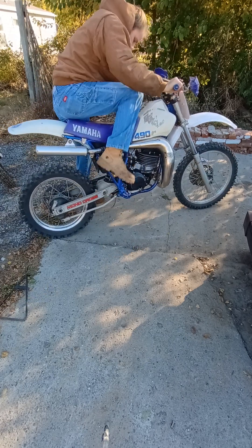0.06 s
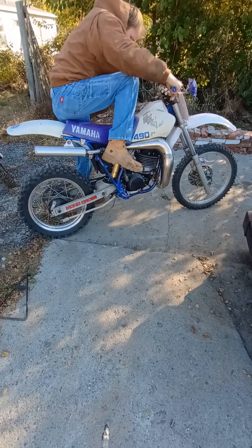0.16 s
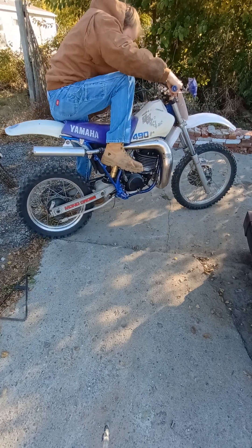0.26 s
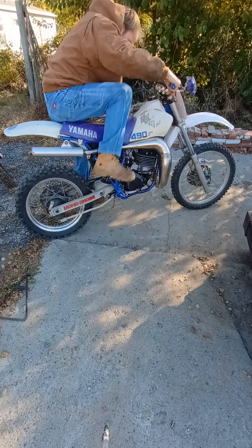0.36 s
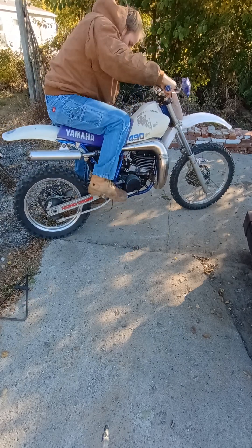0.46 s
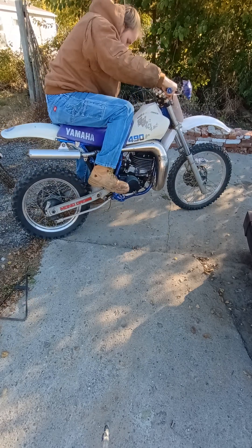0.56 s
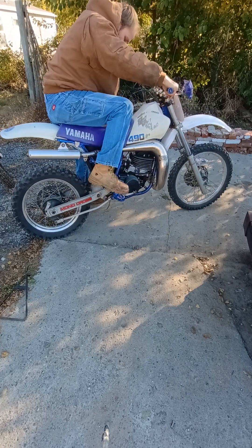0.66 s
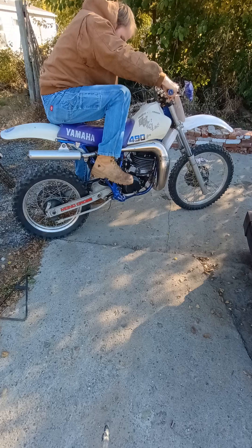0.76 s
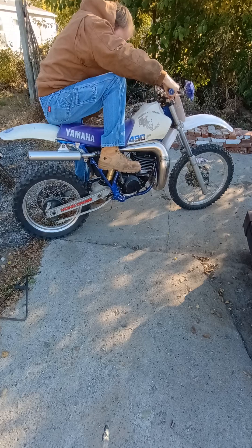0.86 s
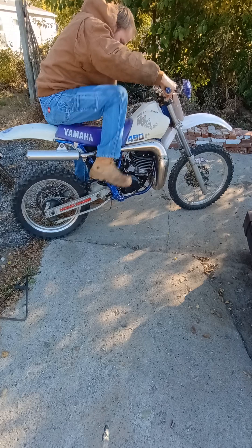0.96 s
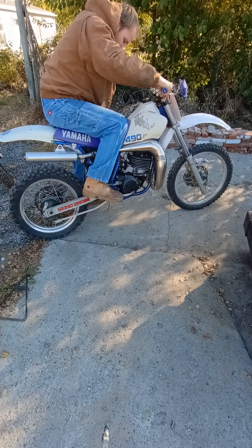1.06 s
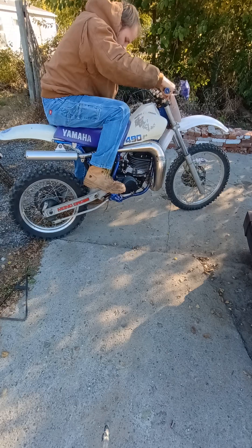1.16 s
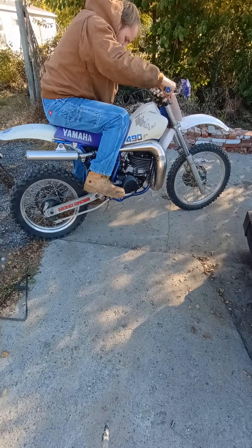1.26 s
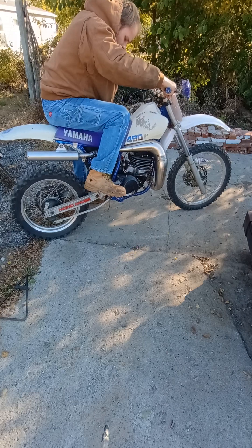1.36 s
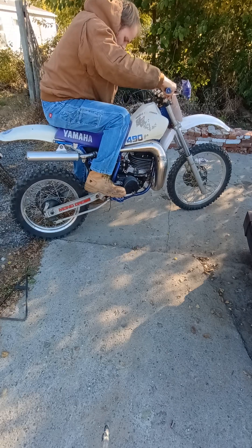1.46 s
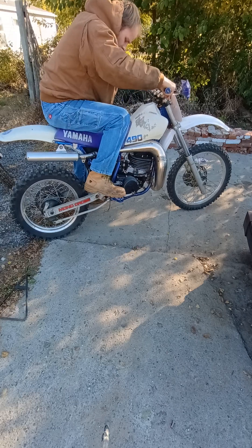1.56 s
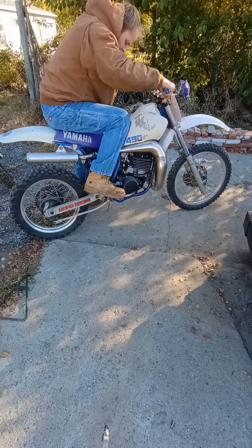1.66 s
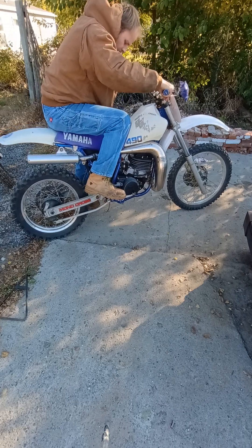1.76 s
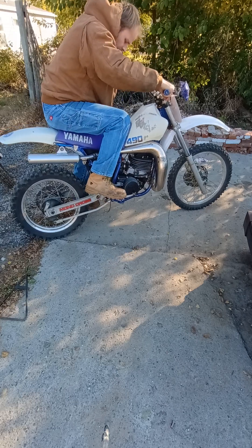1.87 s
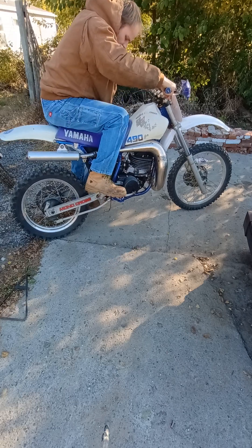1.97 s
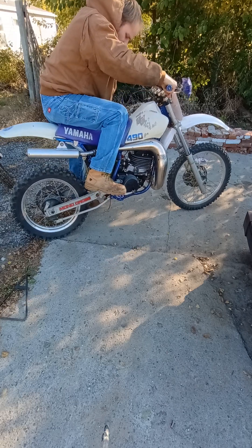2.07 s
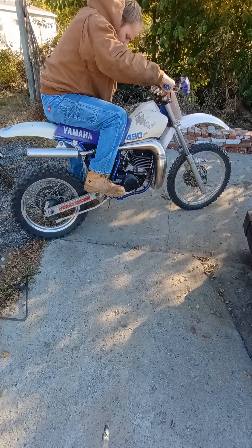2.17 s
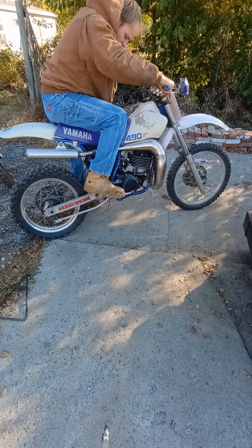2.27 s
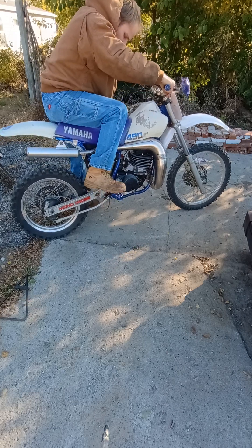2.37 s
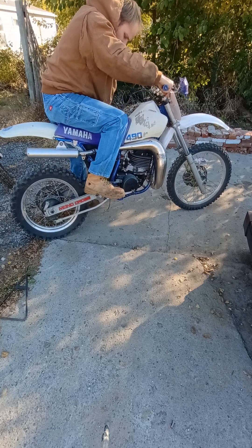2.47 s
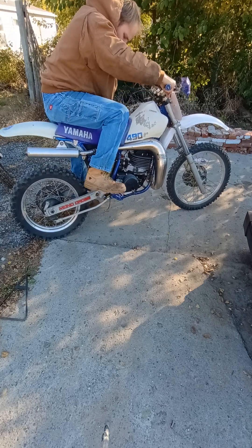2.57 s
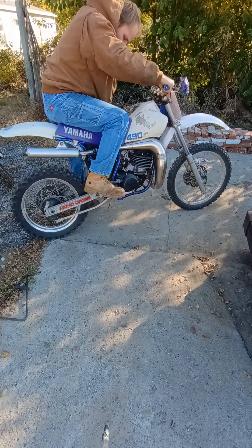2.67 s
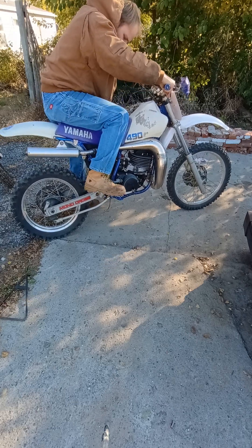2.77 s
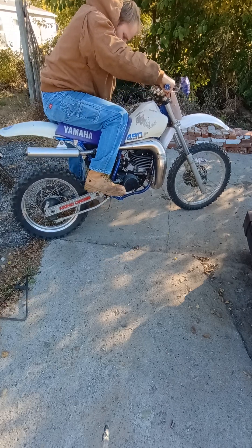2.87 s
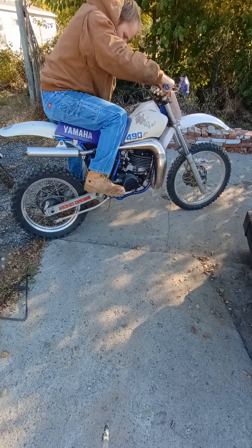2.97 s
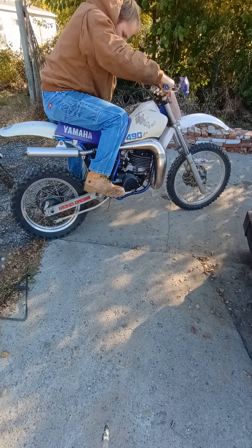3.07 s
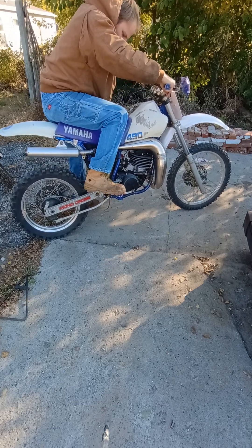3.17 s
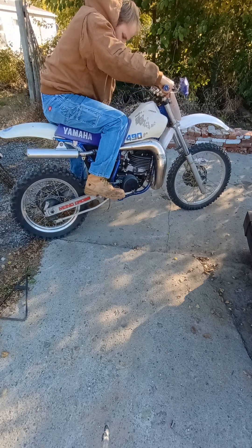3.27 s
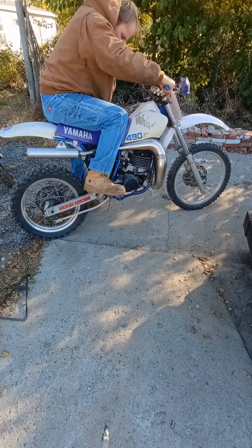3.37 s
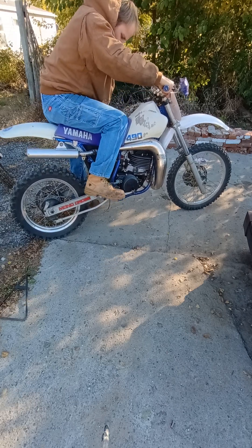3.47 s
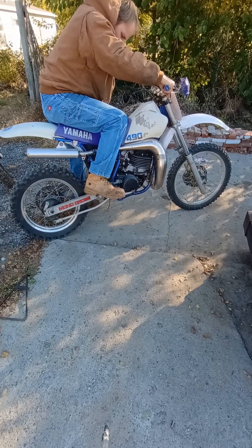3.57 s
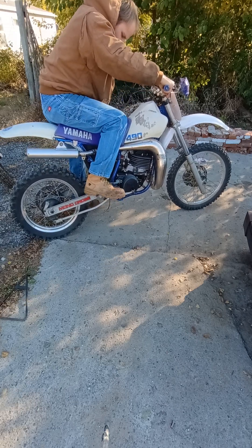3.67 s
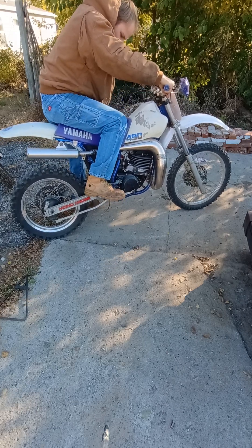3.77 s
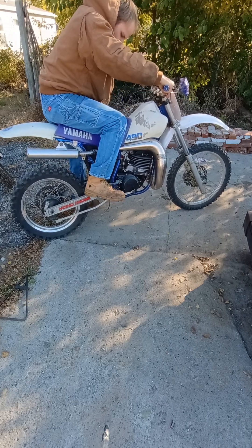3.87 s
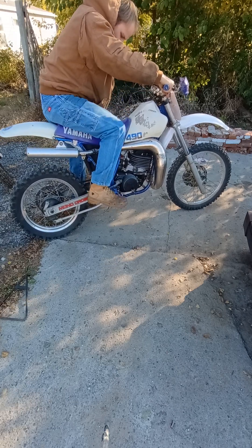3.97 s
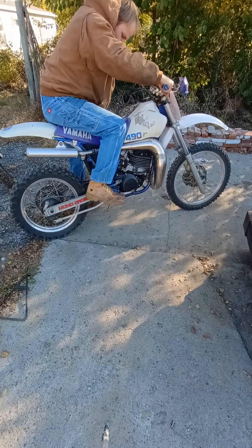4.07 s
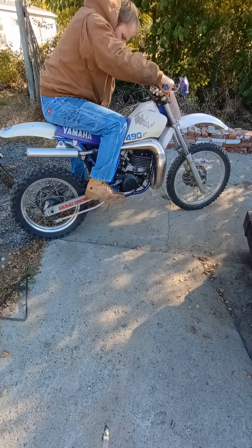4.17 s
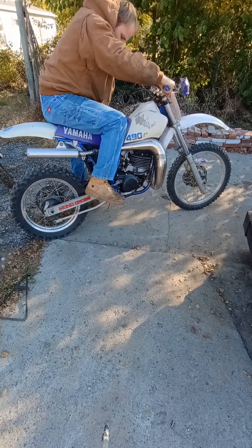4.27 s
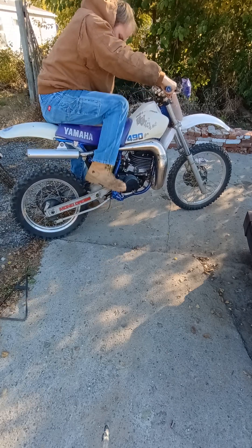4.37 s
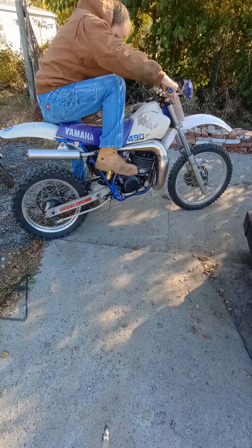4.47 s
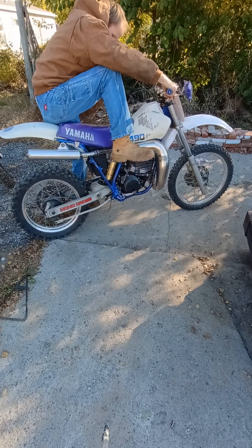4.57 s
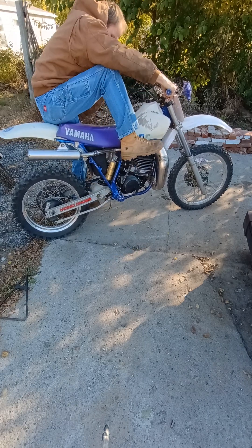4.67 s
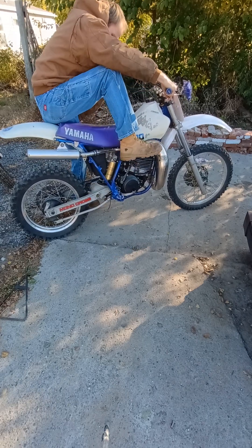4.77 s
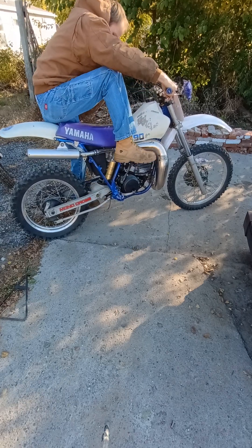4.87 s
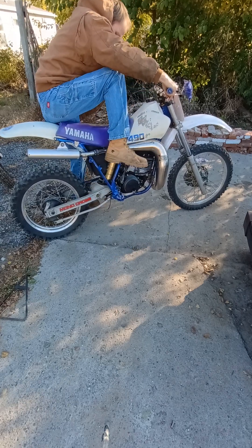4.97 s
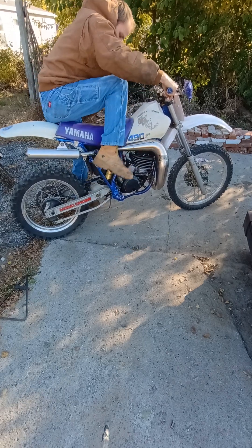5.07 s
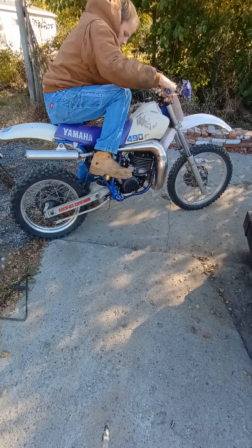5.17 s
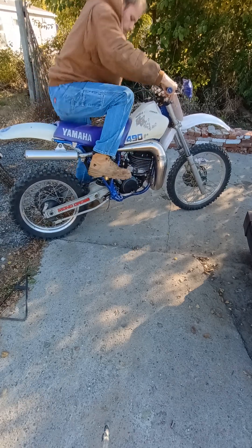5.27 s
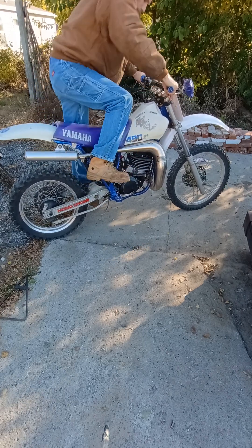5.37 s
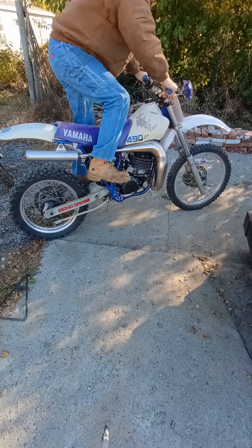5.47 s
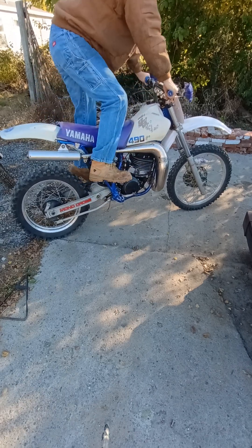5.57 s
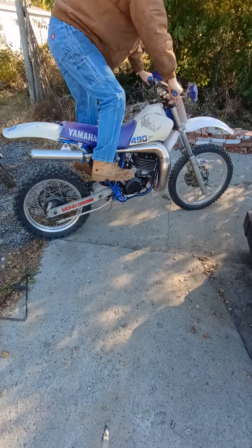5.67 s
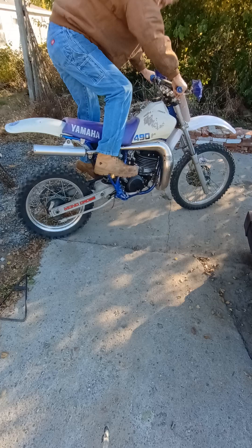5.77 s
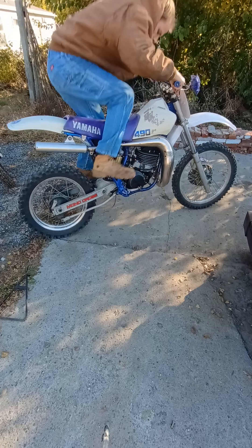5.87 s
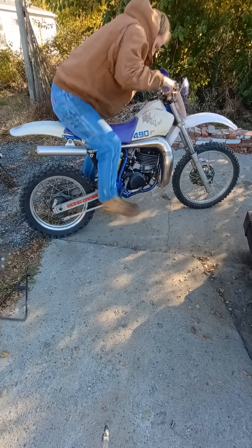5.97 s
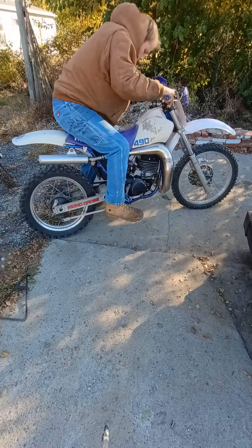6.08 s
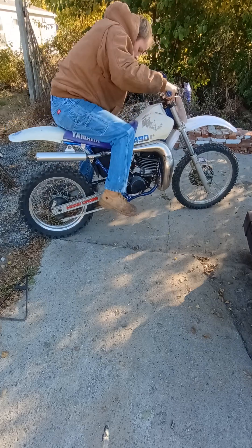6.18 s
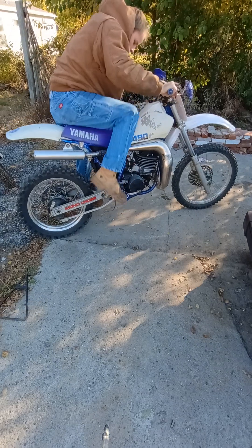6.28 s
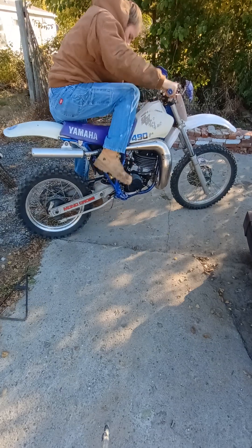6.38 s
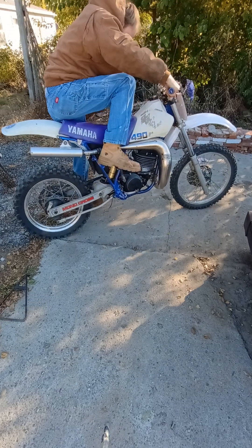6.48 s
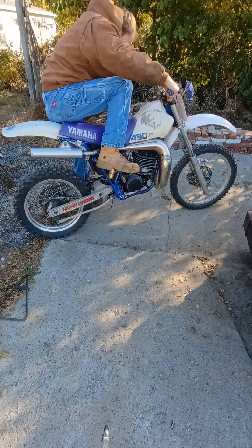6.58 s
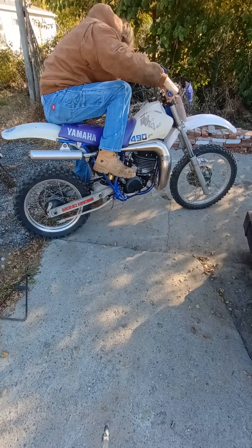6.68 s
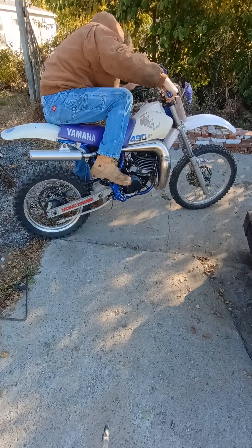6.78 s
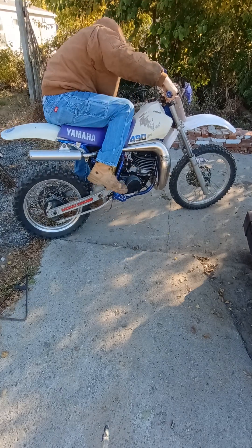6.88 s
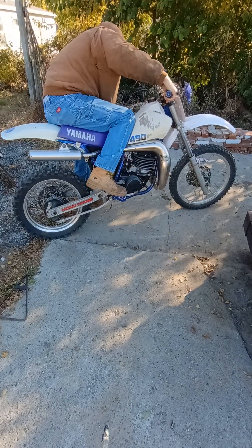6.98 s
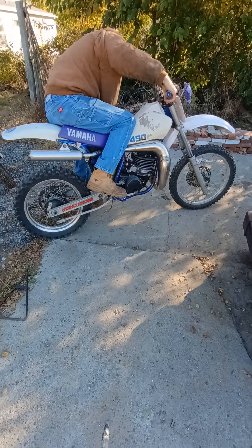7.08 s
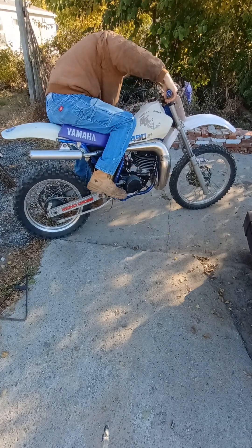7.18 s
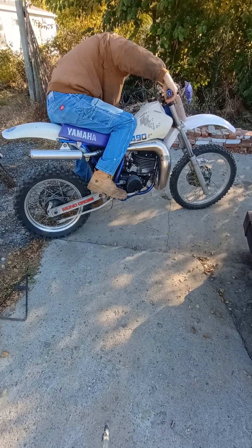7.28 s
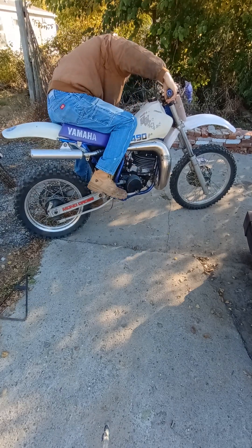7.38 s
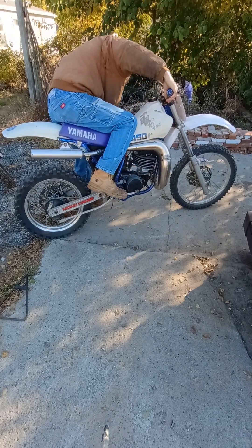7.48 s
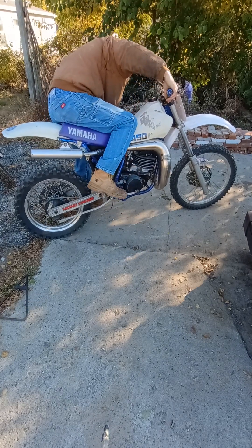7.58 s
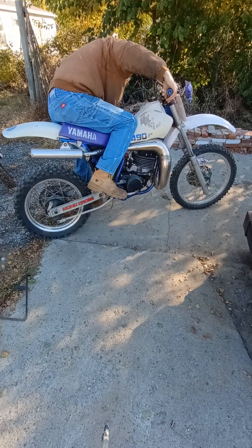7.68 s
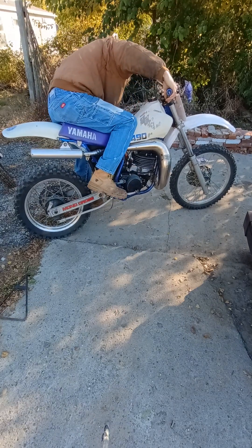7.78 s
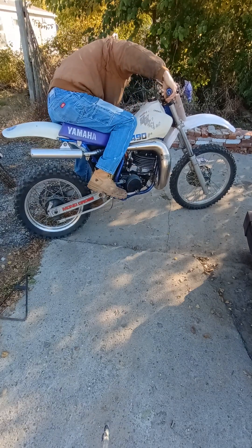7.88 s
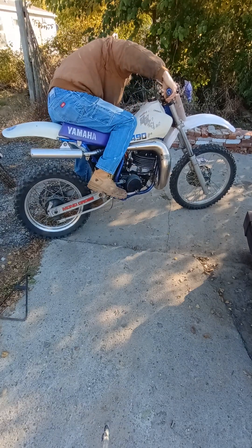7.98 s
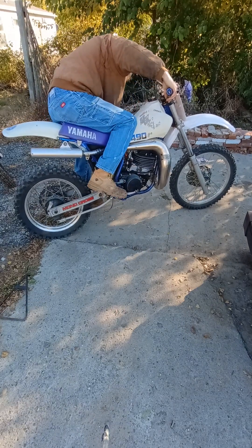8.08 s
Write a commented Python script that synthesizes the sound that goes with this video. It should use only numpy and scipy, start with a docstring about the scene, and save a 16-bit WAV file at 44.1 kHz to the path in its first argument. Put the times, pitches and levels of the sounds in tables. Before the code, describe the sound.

A phone a few metres away in an open concrete yard hears a two-stroke dirt bike being kicked over, with faint steady traffic far behind. At 0 s a kick is already under way: rasping gear clatter, low exhaust puffs and hard steel clanks, loudest near 0.1 s, with a thin gear ring at 0.25 s. Knocks, a scuff and a small squeak close it by 0.6 s; lighter knocks and a scuff follow around 1.1 s. From 1.5 to 4.4 s it is nearly quiet, with tiny ticks and faint creaks. A firm metal click comes at 4.7 s, then cloth rustle, a knock at 5.2 s and high squeaks around 5.6 s. At 6.0 s the second kick chuffs, whines and clatters, with a bright crack at 6.1 s, ending in knocks by 6.7 s. No engine catches; quiet returns until a click at 8 s.

```python
"""Two failed kick starts

A two-stroke dirt bike is kicked over twice on a concrete drive and does not catch; a phone listens a few metres off.
Compression puffs ring the exhaust pipe, noisy clicks make the starter gears clatter, knocks ring steel and frame.
Gliding tones squeak and hum, shaped noise makes boot and cloth scuffs; coloured noise is faint distant traffic."""
import sys
import numpy as np
from scipy import signal
from scipy.fft import rfft, irfft
from scipy.io import wavfile
from scipy.ndimage import uniform_filter1d

SR = 44100
rng = np.random.default_rng(int(sys.argv[2]) if len(sys.argv) > 2 else 0)


def log_audio(samples):
    """Write samples as a 16-bit WAV file to the path given in sys.argv[1]."""
    # one column per channel
    frames = np.atleast_2d(samples).T
    # limit to full scale, then quantise
    limited = np.clip(frames, -1, 1)
    pcm = np.round(limited * 32767).astype(np.int16)
    wavfile.write(sys.argv[1], SR, pcm)


N = 358533

# Exhaust puffs. Each row: start in seconds, peak of the lowest pipe mode in dB, Hz it settles to,
# upper modes in dB relative to the lowest.
PUFFS = [(0.0, -22, 81, 5.5), (0.025, -22.5, 83.4, -7), (0.068, -27.5, 115, -2.5),
         (0.113, -20.5, 104.6, 6.5), (0.133, -28.5, 70, 12), (0.202, -35.5, 115, 11.5),
         (0.258, -25.5, 93, -2), (0.51, -29, 114.5, 4), (1.107, -30, 119, 5), (6.003, -20.5, 113, 4),
         (6.038, -22.5, 100, -2), (6.106, -23.5, 106, -1), (6.19, -13, 90.3, -6.5), (6.275, -20, 81, -8),
         (6.301, -25, 112, -3), (6.363, -19.5, 124, 7.5), (6.412, -27.5, 95, 10.5),
         (6.482, -24.5, 112, 0.5)]
# Upper pipe modes. Each row: Hz, mean gain in dB, t60 in seconds before damping.
PIPE_MODES = [(208, -7, .12), (315.3, 2.5, 0.14), (412, -4.5, 0.082), (480, -8, 0.15), (565, -15.5, 0.063)]
# Crank spin, one list a kick. Each row: time in seconds, gear clatter in dB, air hiss in dB.
SPINS = [
    [(0.0, -32, -53), (0.09, -40.5, -50.5), (0.17, -44, -59), (0.22, -52.5, -70), (0.33, -58, -73),
     (0.414, -72, -93), (0.5, -49.5, -67)],
    [(5.93, -61, -88), (6.0, -47.5, -71), (6.02, -33, -42.5), (6.128, -38, -50.5), (6.178, -34, -48.5),
     (6.256, -38.5, -60), (6.33, -39.5, -48), (6.42, -50, -65), (6.526, -54, -66), (6.6, -49, -76)],
]
# Metal knocks. Each row: start in seconds, level in dB, body in dB and treble tick in dB relative to it,
# tail t60 in seconds, loudest region in Hz.
KNOCKS = [(0.0246, -16, -15.5, -13.5, 0.05, 2016), (0.0854, -4, -6.5, -29, 0.093, 1340),
          (0.1969, -11.5, -13, -27, 0.075, 1870), (0.2445, -8.5, -16.5, -22, 0.057, 1910),
          (0.333, -32.5, -28.5, -30, 0.1, 3550), (0.507, -11.5, -7, -20.5, 0.029, 1140),
          (0.6, -22, -13, -23, 0.029, 2520), (0.918, -32, -15, -40, 0.022, 1780),
          (1.037, -37.5, -21, -30, 0.57, 1090), (1.06, -17.5, -25, -32, 0.051, 1854),
          (1.1109, -24, 7, -30, 0.065, 1610), (1.246, -44, 5, -32, 0.21, 2440),
          (2.6334, -52.5, -24, -26, 0.14, 1600), (2.7702, -52, 0, -29, 0.07, 1530),
          (2.803, -37, -27, -30, 0.029, 2000), (2.8846, -41, -36, -38, 0.021, 2380),
          (3.4233, -43, -2.5, -31, 0.032, 3350), (3.6628, -27.5, -15.5, -29, 0.014, 3460),
          (4.06, -40.5, 13, -30, 0.26, 2020), (4.2237, -46.5, -6, -26, 0.058, 2460),
          (4.4112, -40.5, -15, -32, 0.12, 1810), (4.4895, -23, -42, -23, 0.033, 1915),
          (4.6754, -10, -16, -18, 0.034, 1885), (5.0921, -48.5, -0.5, -28, 0.14, 1950),
          (5.1424, -46, -15, -26, 0.24, 1730), (5.1864, -22, -2, -32, 0.026, 1650),
          (5.3555, -41.5, 20, -7.5, 0.028, 1000), (5.8617, -47, -8, -22, 0.12, 5530),
          (5.9339, -38, -11, -36.5, 0.16, 3950), (6.002, -24.5, -16.5, -4, 0.33, 5410),
          (6.0451, -19.5, -23, -32.5, 0.07, 962), (6.078, -11, -6, -24, 0.035, 1940),
          (6.099, -3.5, -14, -24.5, 0.05, 1935), (6.1852, -13, -22, -21.5, 0.088, 1570),
          (6.307, -10.5, -40, -19.5, 0.07, 1920), (6.3889, -20, -25, -20, 0.021, 1000),
          (6.4435, -34, -1, -11, 0.13, 1030), (6.4731, -26, -11, -14, 0.037, 2080),
          (6.608, -12.5, -12.5, -18, 0.053, 2040), (6.668, -16, -19.5, -34, 0.075, 1910),
          (7.007, -42, 0, -32, 0.072, 1800), (8.012, -15, -17.5, -16.5, 0.033, 1586),
          (8.04, -39, -15, -37, 0.32, 3300), (8.074, -46, -31, -32, 0.2, 1440)]
# Lever and cases. Each row: Hz, mean gain in dB, t60 in seconds before damping.
STEEL_MODES = [(1110, -4, .1), (1378, -4, .1), (1521, -3, .1), (1712, 0, .18), (1868, 0, .2),
               (1950, -2, .15), (2057, -2, .26), (2282, -4, .2), (2493, -2, .12), (2625, -3, .2),
               (2900, -12, .26), (3080, -2, .1), (3330, -3, .1), (3570, -3, .1), (3840, -5, .12),
               (4126, -4, .1), (4500, -6, .12), (4940, -6, .1), (5282, -6, .12), (5700, -7, .1),
               (6200, -9, .1), (6800, -11, .08)]
# Frame. Each row: Hz, mean gain in dB, t60 in seconds before damping.
FRAME_MODES = [(465, 3, 0.065), (566, 3, 0.11), (774, -6.5, .08), (926, 0.5, 0.12), (1099, -5.5, 0.038)]
# Lever on its end stop. Each row: start in seconds, level of the treble crack in dB.
SLAMS = [(0.0862, -10), (6.099, -5)]
# Freed starter gear. Each row: start in seconds, peak in dB.
FREED_GEAR = [(0.246, -22), (6.609, -38.5), (6.672, -31.5)]
# Its modes. Each row: Hz, mean gain in dB, t60 in seconds before damping.
GEAR_MODES = [(1800, -3, 0.64), (2010, -8, 0.45), (2044, 0, 0.69), (2950, 1, 0.4), (2900, -1, 0.63),
              (4230, -13, 0.33)]
# Starter shaft whines, one list a whine. Each row: time in seconds, Hz, level in dB.
WHINES = [
    [(.8, 1990, -55), (.92, 1927, -73)],
    [(5.62, 5670, -68), (5.76, 5560, -77)],
    [(5.66, 4365, -73), (5.82, 4420, -66)],
    [(5.79, 5320, -82), (5.842, 5530, -49), (5.898, 5694, -40), (6.01, 5480, -46.5)],
    [(6.13, 4010, -35), (6.264, 4155, -35), (6.31, 4040, -39)],
]
# Squeaking pivots. Each row: loudest moment in seconds, rise in seconds, fall in seconds, top level in dB,
# Hz at the start, at the loudest and at the end.
SQUEAKS = [(.45, .03, 0.064, -46.5, 1450, 1300, 1350), (.45, 0.048, .08, -56, 4300, 4220, 4600),
           (4.8, .06, .03, -50.5, 1950, 1850, 1800), (5.3, .015, 0.094, -50, 4050, 4300, 3100),
           (4.03, 0.12, 0.035, -66.5, 2666, 3380, 5700), (4.105, 0.014, 0.032, -69, 4100, 4000, 4400),
           (4.3, .07, 0.045, -62, 2490, 2850, 3100), (4.278, .018, 0.037, -65.5, 3770, 3690, 3550),
           (4.3, 0.044, .02, -73, 5660, 5690, 5400), (4.365, 0.018, .035, -71, 4120, 4080, 4050),
           (4.572, .072, 0.14, -45.5, 3590, 4070, 2800), (4.935, .12, 0.034, -54.5, 1980, 3700, 4400),
           (5.508, .04, .045, -50.5, 8780, 8490, 8300), (5.567, .022, 0.049, -48.5, 5100, 5700, 5800),
           (5.59, 0.012, 0.16, -40, 4640, 4300, 4150), (5.594, 0.012, 0.037, -54.5, 8400, 9060, 6900),
           (7.97, 0.051, .02, -80, 4600, 4720, 4300), (2.3, 0.037, 0.052, -72, 4100, 4150, 4150),
           (3.2, .3, .1, -78, 2360, 2500, 2800)]
# Frame hum as the rider's weight shifts. Each row: loudest moment in seconds, rise in seconds,
# fall in seconds, top level in dB, Hz at the start, at the loudest and at the end.
HUMS = [(.38, .1, 0.066, -39.5, 260.5, 183, 186), (2.9, 0.093, .15, -62, 106, 113, 108),
        (3.318, 0.061, 0.079, -56.5, 230, 248, 196), (3.7, 0.061, 0.032, -52.5, 230.6, 217, 220),
        (4.795, 0.13, 0.051, -48, 130, 124, 130), (4.89, 0.056, 0.068, -50.5, 129, 118, 115),
        (5.205, 0.027, 0.18, -48.5, 123, 120, 128)]
# Boot and cloth scuffs. Each row: start in seconds, level in dB, treble in dB relative to it,
# loudest region in Hz.
SCUFFS = [(0.4267, -38.5, -13.5, 4080), (0.541, -23.5, -11.5, 1890), (1.1413, -27.5, -9, 1980),
          (1.652, -53.5, -21, 2130), (1.7538, -55, -8.5, 1620), (1.819, -36, -14.5, 2600),
          (1.942, -47.5, -9, 2260), (2.3, -60.5, -5.5, 2107), (2.469, -50.5, -25, 2010),
          (2.5502, -44.5, -12.5, 3960), (2.777, -48, -20, 2490), (3.5794, -43, -33, 1970),
          (4.6185, -53.5, 2.5, 3700), (5.2793, -39, -11.5, 4660), (5.436, -41, -5, 2660),
          (6.4902, -25, -10.5, 1980), (2.68, -58, -30, 2300), (3.26, -60, -20, 3830),
          (3.77, -57, -15, 2700)]
# Clothes and seat as the rider shifts and climbs up, one list a stretch. Each row: time in seconds, level in dB.
RUSTLES = [
    [(2.2, -78), (2.6, -77), (3.0, -90), (3.6, -74), (4.0, -84), (4.6, -69), (4.75, -53), (4.91, -70.5),
     (5.15, -70), (5.3, -57.5), (5.63, -72), (5.8, -60)],
]
# Cloth bands. Each row: Hz near the lower edge, relative level in dB before flicker.
CLOTH_BANDS = [(2000, -9.5), (2700, -8.5), (3400, -10.5), (4100, -15), (5000, -15), (5600, -11), (7200, -27)]
# Traffic spectrum. Each row: Hz, relative density in dB per Hz.
TOWN_COLOUR = [(15, -39), (25, -16), (70, -3), (124, -7.5), (163, -14.5), (192, -12), (472, -13),
               (527, -15.5), (691, -13.5), (1480, -17.5), (2290, -28.5), (4200, -38.5), (6600, -38),
               (15000, -48), (16700, -56)]
# Traffic at the two ports. Each row: Hz, likeness of left and right from -1 to 1.
TOWN_ALIKE = [(60, 1), (130, 0.8), (290, 0.93), (640, 0.38), (1410, -0.56), (3100, 0.56), (6820, -0.55),
              (15000, -0.97)]

PUFF_SCALE_S, PIPE_T60_S = 0.028, 0.12
RUMBLE_DB = 1.5  # relative to the spin level
RING_DB, RING_DB_PER_DB = -12.5, -0.25  # lighter knocks hold a larger share of ring
SQUEAK_FROM_DB, SQUEAK_TO_DB = -8, -43  # both ends relative to the top
HUM_FROM_DB, HUM_TO_DB = -10, -9
SCUFF_SCALE_S = .044
TOWN_DB, MIC_HISS_DB = -59.5, -88.5
PORT_LAG_S = .00018  # the bike reaches the left port first
TOP_HZ = 16250


def undb(db):
    """Turn dB into an amplitude factor."""
    return 10 ** (np.asarray(db) / 20)


def level(x, db):
    """Set the rms."""
    return x * undb(db) / np.sqrt(np.mean(x ** 2))


def peak(x, db):
    """Set the highest swing."""
    return x * undb(db) / np.abs(x).max()


def band(x, lo_hz, hi_hz):
    """Keep the span between two frequencies."""
    return signal.sosfilt(signal.butter(3, [lo_hz, hi_hz], "bandpass", fs=SR, output="sos"), x)


def walk(rate_hz, size):
    """Random values held for 1 / rate_hz and slewed twice."""
    k = int(SR / rate_hz)
    held = np.repeat(rng.standard_normal(size // k + 1), k)
    return 0.81 * uniform_filter1d(uniform_filter1d(held, k), k)[:size]


def wide(size, apart):
    """Noise from a wide body: a share of its power differs at the two ports."""
    same, left, right = rng.standard_normal((3, size))
    apart = np.clip(apart, 0, 1)
    return np.sqrt(1 - apart) * same + np.sqrt(apart) * np.array([left, right])


def ring(push, modes, damp, scatter_db, focus_hz=None):
    """A push through decaying modes, weighted and tuned anew each time; a focus favours the modes near it."""
    hz, db, t60_s = np.transpose(modes)[:, :, None]
    t = np.arange(len(push)) / SR
    chance = rng.standard_normal((2, len(hz), 1))
    if focus_hz:
        db = db - 16 * np.abs(np.log2(hz / focus_hz))  # dB per octave
    gain = undb(db + scatter_db * chance[0])
    hz = hz * (1 + .006 * chance[1])
    decay = undb(-60 * t / (t60_s * damp))
    response = (gain * decay * np.sin(2 * np.pi * hz * t)).sum(0)
    return signal.fftconvolve(push, response)[:len(t)]


def add(out, s, x, pan_db=0):
    """Mix in one row, or a row for each port, at a time and a side (left minus right in dB)."""
    for port, sign in enumerate((1, -1)):
        i = max(int(round((s - sign * PORT_LAG_S / 2) * SR)), 0)
        row = np.atleast_2d(x)[-port]
        out[port, i:i + len(row)] += row[:N - i] * undb(sign * pan_db / 2)


def swells(rows, from_db, to_db):
    """Each row becomes a rise to its top and a fall, as (s, Hz, dB) corners."""
    return [[(s - rise_s, hz[0], db + from_db), (s, hz[len(hz) // 2], db), (s + fall_s, hz[-1], db + to_db)]
            for s, rise_s, fall_s, db, *hz in rows]


def exhaust(out):
    """Each puff swells the pipe's lowest mode, which sags in pitch; turbulent gas drives the upper modes."""
    t = np.arange(SR // 2) / SR
    for s, db, hz, upper_db in PUFFS:
        flow = (t / PUFF_SCALE_S) ** 2 * np.exp(-t / PUFF_SCALE_S * 3)
        swell = (1 - np.exp(-t / 0.0057)) * undb(-60 * t / PIPE_T60_S) * undb(2.0 * walk(48, len(t)))
        pitch_hz = hz * (1 + 0.16 * np.exp(-t / 0.025))
        low = swell * np.sin(2 * np.pi * np.cumsum(pitch_hz) / SR)
        gas = flow * rng.standard_normal(len(t))
        upper = peak(ring(gas, PIPE_MODES, 0.38, 2.0), 0) + peak(band(gas, 130, 440), -5.5)
        add(out, s, peak(low, db) + peak(upper, db + upper_db))


def crank(out):
    """Gear teeth click densely into the cases, air hisses, the cases rumble."""
    for rows in SPINS:
        s, db, hiss_db = np.transpose(rows)
        t = np.arange(s[0], s[-1], 1 / SR)
        struck = rng.random(len(t)) < 500 / SR  # mean 500 clicks a second
        clicks = rng.standard_normal(len(t)) * struck * undb(16.0 * walk(40, len(t)))
        rasp = band(wide(len(t), 0.68), 1200, 6400) * undb(11.0 * walk(50, len(t)))
        clatter = level(ring(clicks, STEEL_MODES, .15, 3.1), -9.5)
        clatter = clatter + level(band(clicks, 1200, 8000), -4.5) + level(rasp, 2)
        hiss = level(band(wide(len(t), 0.31), 7900, 15500) * undb(2.0 * walk(60, len(t))), 0)
        rumble = band(rng.standard_normal(len(t)), 150, 930) * undb(2.5 * walk(50, len(t)))
        spin = undb(np.interp(t, s, db))
        add(out, s[0], spin * (clatter + level(rumble, RUMBLE_DB)))
        add(out, s[0], undb(np.interp(t, s, hiss_db)) * hiss, 5)


def knocks(out):
    """Each blow chatters for some ms in loose metal, leaves a noisy tail and a ring, stronger in light blows' mix."""
    t = np.arange(int(.4 * SR)) / SR
    for s, db, body_db, tick_db, t60_s, focus_hz in KNOCKS:
        ring_db = RING_DB + RING_DB_PER_DB * db
        rise = np.minimum(t / 0.0026, 1)
        chatter = rng.standard_normal(len(t)) * np.exp(-t / 0.0091) * rise
        tail = wide(len(t), 1.0) * (undb(-60 * t / t60_s) + 0.66 * np.exp(-t / 0.008)) * rise
        steel_ring = ring(chatter, STEEL_MODES, min(t60_s / .11, 1), 3.0, focus_hz)
        steel = peak(band(steel_ring, 900, 9000), ring_db)
        steel = steel * undb(6.0 * walk(200, len(t)))  # loose parts buzz as they ring
        steel = steel + peak(band(tail, 0.98 * focus_hz, 1.15 * focus_hz), -7)
        steel = steel + peak(band(tail, 1900, 5300), -4)
        frame_ring = ring(chatter, FRAME_MODES, t60_s / 0.27, 2.5)
        body = peak(band(frame_ring, 250, 860), -2.8) + peak(band(tail, 230, 1100), -7.0)
        tick = peak(band(tail * (0.36 + np.exp(-t / 0.0096)), 6800, 10000), 0)
        add(out, s, undb(db) * (steel + undb(body_db) * body))
        add(out, s, undb(db + tick_db) * tick, 7.5)


def slams(out):
    """The lever hits its end stop: a hard, bright burst of noise."""
    t = np.arange(int(.08 * SR)) / SR
    for s, db in SLAMS:
        crack = wide(len(t), 0.17) * (np.exp(-t / 0.0033) + .25 * np.exp(-t / 0.0074))
        add(out, s, peak(band(crack, 4000, 11000), db), 5)


def gear_ring(out):
    """A noise burst sets the freed gear's close modes into a thin, beating ring."""
    t = np.arange(int(.4 * SR)) / SR
    for s, db in FREED_GEAR:
        burst = rng.standard_normal(len(t)) * np.exp(-t / .004)
        tone = ring(burst, GEAR_MODES, 0.7, 1.5) * undb(6.0 * walk(120, len(t)))
        add(out, s, peak(tone, db))


def waver(out, tables, hz_share, breath_db, rate_hz):
    """Unsteady tones: the pitch shakes around its curve, a noisy skirt makes them breathy."""
    for rows in tables:
        s, hz, db = np.transpose(rows)
        t = np.arange(s[0], s[-1], 1 / SR)
        pitch_hz = np.interp(t, s, hz) * (1 + hz_share * walk(rate_hz / 4, len(t)))
        skirt = undb(breath_db) * (walk(rate_hz, len(t)) + 1j * walk(rate_hz, len(t)))
        gain = undb(np.interp(t, s, db)) * signal.windows.tukey(len(t), .15)
        tone = np.exp(2j * np.pi * np.cumsum(pitch_hz) / SR)
        add(out, s[0], gain * ((1 + skirt) * tone).real)


def squeaks(out):
    """Rubbing pivots squeal at gliding pitches."""
    waver(out, swells(SQUEAKS, SQUEAK_FROM_DB, SQUEAK_TO_DB), 0.0064, -0.5, 430)


def whines(out):
    """The starter shaft sounds steadier, purer tones."""
    waver(out, WHINES, .002, -14, 300)


def hums(out):
    """The frame hums low and very unsteadily under shifting weight."""
    waver(out, swells(HUMS, HUM_FROM_DB, HUM_TO_DB), 0.059, 4.6, 93.94)


def scuffs(out):
    """Grainy friction that swells and dies, stressed where the rubbed part resonates."""
    t = np.arange(int(.18 * SR)) / SR
    for s, db, treble_db, focus_hz in SCUFFS:
        swell = (t / SCUFF_SCALE_S) ** 1.14 * np.exp(-3.5 * t / SCUFF_SCALE_S)
        rub = swell * undb(4.76 * walk(123, len(t))) * wide(len(t), 1.0)
        mids = peak(band(rub, 560, 4200), -3) + peak(band(rub, 0.76 * focus_hz, 1.124 * focus_hz), -8)
        add(out, s, undb(db) * mids + peak(band(rub, 6100, 13400), db + treble_db))


def rustle(out):
    """Patchy friction of cloth on the seat, each band flickering alone."""
    for rows in RUSTLES:
        s, db = np.transpose(rows)
        t = np.arange(s[0], s[-1], 1 / SR)
        cloth = np.zeros(len(t))
        for hz, band_db in CLOTH_BANDS:
            strip = band(rng.standard_normal(len(t)), hz / 1.02, hz * 1.094)
            cloth += level(strip, band_db) * undb(10.0 * walk(25, len(t)))
        gain = undb(np.interp(t, s, db)) * signal.windows.tukey(len(t), .1)
        add(out, s[0], level(cloth, 0) * gain)


def yard(dry):
    """Concrete, hedge and a wall return scattered echoes that differ at the two ports."""
    t = np.arange(int(.25 * SR)) / SR
    echoes = rng.standard_normal((2, len(t))) * undb(-60 * t / .15) * (t > .002)
    echoes = band(echoes / np.sqrt((echoes ** 2).sum(1, keepdims=True)), 480, 14000)
    return signal.fftconvolve(dry, undb(-5) * echoes, axes=1)[:, :N]


def town():
    """Far traffic as coloured noise of drifting level; its bass flickers, the deepest alike at both ports."""
    hz = np.maximum(np.fft.rfftfreq(N, 1 / SR), 1)
    colour_hz, colour_db = np.transpose(TOWN_COLOUR)
    alike_hz, likeness = np.transpose(TOWN_ALIKE)
    colour = undb(np.interp(np.log(hz), np.log(colour_hz), colour_db))
    alike = np.clip(np.interp(np.log(hz), np.log(alike_hz), likeness), -1, 1)
    mid, side = rfft(rng.standard_normal((2, N))) * colour * np.sqrt([1 + alike, 1 - alike])
    pair = irfft(np.array([mid + side, mid - side]), N)
    flicker = band(pair, 32, 440) * (undb(2.0 * walk(4.2, N)) - 1)
    return level(pair + flicker, TOWN_DB) * undb(1.0 * walk(3.0, N))


def scene():
    """Sum the bike and rider, their echoes from the yard, and the traffic."""
    bike = np.zeros((2, N))
    for source in (exhaust, crank, knocks, slams, gear_ring, squeaks, whines, hums, scuffs, rustle):
        source(bike)
    return bike + yard(bike) + town()


def record(dry):
    """The phone hisses faintly, rounds the loudest peaks, drops the deepest bass and cuts the top."""
    hiss = level(band(rng.standard_normal(dry.shape), 9000, 18000), MIC_HISS_DB)
    rounded = .85 * np.tanh((dry + hiss) / .85)
    thin = signal.sosfilt(signal.butter(3, 55, "highpass", fs=SR, output="sos"), rounded)
    return signal.sosfilt(signal.ellip(10, .2, 80, TOP_HZ, fs=SR, output="sos"), thin)


dry = scene()
out = record(dry)
log_audio(out)
```